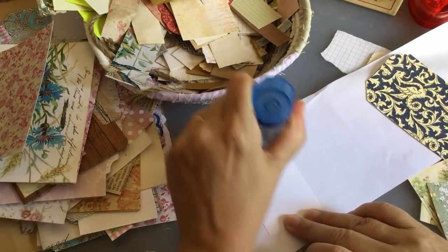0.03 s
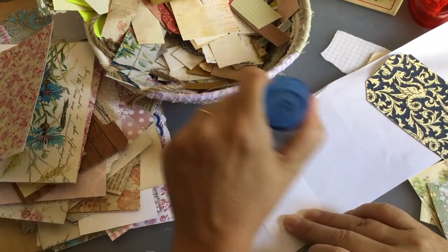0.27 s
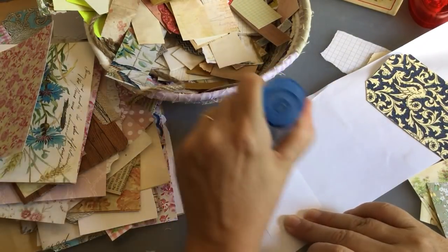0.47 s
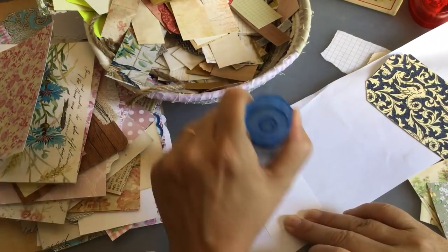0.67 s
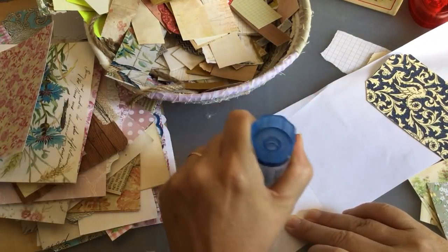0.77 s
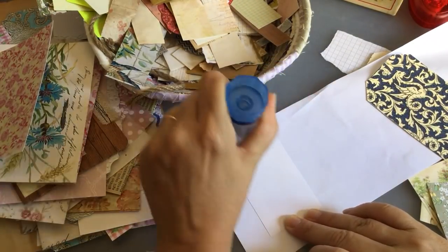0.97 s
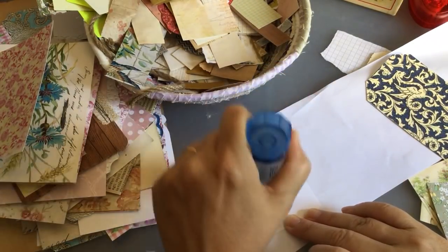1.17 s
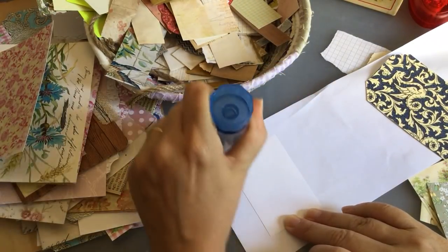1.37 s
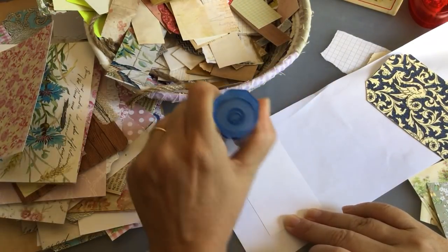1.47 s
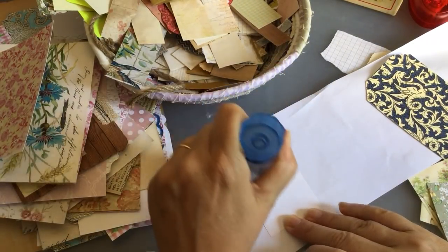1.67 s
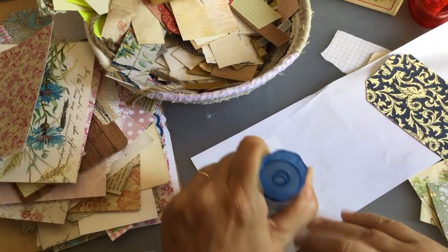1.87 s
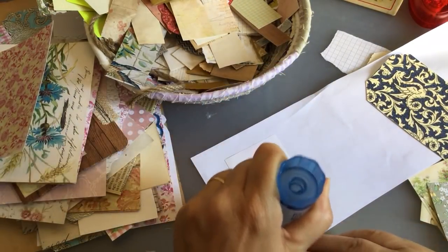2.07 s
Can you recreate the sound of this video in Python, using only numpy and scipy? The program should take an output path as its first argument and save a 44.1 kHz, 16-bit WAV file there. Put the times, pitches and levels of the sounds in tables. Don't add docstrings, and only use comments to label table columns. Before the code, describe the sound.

Five crisp taps of a plastic glue stick on paper, then a small sticky peel crackle

```python
import sys
import numpy as np
from scipy import signal
from scipy.io import wavfile

SR = 44100
rng = np.random.default_rng(int(sys.argv[2]) if len(sys.argv) > 2 else 0)


def voltage_ratio(decibels):
    exponent = np.asarray(decibels, float) / 20
    return 10 ** exponent


def dump_mix(stems):
    frames = np.atleast_2d(stems).T
    limited = np.clip(frames, -1, 1)
    pcm = np.round(limited * 32767).astype(np.int16)
    wavfile.write(sys.argv[1], SR, pcm)


N = 93933

# (tick time [s], push level [dB], contact time [ms])
DABS = [
    (.0127, -21, .55),
    (.4684, -19.2, .3),
    (.8601, -20.5, .42),
    (1.3067, -21, .3),
    (1.6782, -19.9, .18),
]
# (tick level [dB], tick pitch [Hz], tick top [Hz], knock level [dB], rustle level [dB])
DAB_SURFACES = [
    (-25.5, 4320, 9100, -55, -60),
    (-27, 4200, 9500, -45, -52.5),
    (-27, 5000, 9000, -49, -58),
    (-24, 5030, 6900, -49, -54),
    (-20, 4240, 5300, -37, -51),
]
# (time [s], level [dB])
HAND_NUDGES = [(.135, -42.5), (.257, -39), (.665, -42.5), (0.978, -46), (1.409, -47), (1.928, -52),
               (2.001, -48)]
# (pitch [Hz], level [dB], t60 [s], side [+1 toward, -1 away])
TABLE_MODES = [(83.2, -9.3, .075, 1), (98.9, -10.3, .39, -1), (135.8, -18.4, .35, -1), (167.3, -17, .27, 1),
               (181.5, -6.7, .102, -1), (212.6, -15.5, .36, -1), (261.2, -13, .196, -1),
               (317.2, -7.8, .066, -1), (365.5, -3.4, .177, 1), (397.1, -10.1, .11, 1),
               (442, -17.2, .33, -1), (524, .5, .058, 1), (559.4, -20, .13, -1), (683, -1.4, .08, 1)]
# (pitch [Hz], level
# [dB], t60 [s])
KNOCK_MODES = [(309.3, -11, 0.66), (450, -18, 0.48), (870, -8, 0.095), (932, 0, 0.082), (1124, 1.5, 0.063),
               (1218, -9.5, 0.24), (1325, 3.5, 0.037), (1537, -9, 0.075), (2220, -30, 0.045)]
# (frequency [Hz], density [dB per Hz])
TAIL_COLOUR = [(150, 14), (350, 7.5), (700, 8), (1500, 0.5), (3000, 3.5), (6000, -6), (11000, -17.5),
               (16000, -25)]
# (frequency [Hz], t60 [s])
TAIL_DECAY = [(100, 0.69), (300, 0.9), (700, 0.29), (3000, 0.11), (8000, 0.087), (15000, 0.12)]
# (frequency [Hz], rise time [s])
TAIL_RISE = [(200, .01), (2000, .003), (12000, .006)]
# (time [s], snap level [dB], crackle level around it [dB], crackle spread [s])
GLUE_SNAPS = [
    (1.8905, -29, -59.5, 0.0098),
    (2.2, -46, -57, 0.0042),
    (1.8955, -46, -61, 0.0027),
    (1.9442, -43.5, -63, 0.0012),
    (2.07, -82, -71.5, 0.011),
]
# (time [s], level [dB], spread [s])
PAPER_RUSTLES = [(.235, -78, 0.0027), (.612, -80, .003), (1.095, -73, 0.0028), (1.12, -80, .003),
                 (1.946, -58, 0.0025), (2.076, -76.5, 0.018)]
# (frequency [Hz], density [dB per Hz])
AIR_COLOUR = [(35, -49), (65, -25), (100, -3.5), (150, -9.5), (280, -11), (700, -24.5), (1500, -22.5),
              (16000, -52.5)]


def rms_one(x):
    return x / np.sqrt(np.mean(x ** 2) + 1e-20)


def at_hz(points, hz):
    table_hz, value = np.transpose(points)
    return np.interp(np.log(hz), np.log(table_hz), value)


def butter(x, order, hz, kind):
    return signal.sosfilt(signal.butter(order, hz, kind, fs=SR, output="sos"), x)


def clicks(times, size):
    out = np.full(N + SR, 1e-18)
    at = np.clip(np.asarray(times) * SR, 0, N)
    np.add.at(out, at.astype(int), size * (1 - at % 1))
    np.add.at(out, at.astype(int) + 1, size * (at % 1))
    return out[:N]


def delay(x, seconds):
    t = np.arange(N)
    return np.interp(t - SR * seconds, t, x)


def ring(x, hz, t60):
    r, w = voltage_ratio(-60 / (t60 * SR)), 2 * np.pi * hz / SR
    return signal.lfilter([0, np.sin(w)], [1, -2 * r * np.cos(w), r * r], x)


def decay(x, t60):
    return signal.lfilter([1], [1, -voltage_ratio(-60 / (t60 * SR))], x)


def soften(x, ms):
    r = np.exp(-1000 / (ms * SR))
    return signal.sosfilt([[1 - r, 0, 0, 1, -r, 0]] * 3, x)


def bands(colour, gain):
    edges = 35 * 2 ** np.arange(0, 9.1, 1 / 3)
    white = rng.standard_normal((2, N + 4000))
    out = 0
    for k, (low, high) in enumerate(zip(edges, edges[1:])):
        hz = np.sqrt(low * high)
        band = butter(white[k % 2], 2, [low, high], "band")[4000:]
        out = out + voltage_ratio(at_hz(colour, hz)) * gain(hz) * band
    return out


def table():
    push_lag_s, bending_lag_s = .00027, .00145
    rebound_s, rebound_db, rebound_ms = .0241, -1.4, .69
    push = 0
    for s, db, ms in DABS:
        start = s + push_lag_s - ms * .0012
        push = push + soften(clicks([start], voltage_ratio(db)), ms)
    push = push + voltage_ratio(rebound_db) * soften(delay(push, rebound_s), rebound_ms)
    for s, db in HAND_NUDGES:
        push = push + soften(clicks([s], voltage_ratio(db)), 0.73)
    out = 0
    for hz, db, t60, side in TABLE_MODES:
        arrival = delay(push, bending_lag_s * np.sqrt(200 / hz))
        out = out + side * voltage_ratio(db) * ring(arrival, hz, t60)
    return out


def ticks():
    lags = np.array([-6, -4, -2, 0, 1, 3])
    loss_db = np.array([-19, -20, -11, 0, -15, -17])
    out = 0
    for (s, _, ms), (db, hz, top_hz, knock_db, _) in zip(DABS, DAB_SURFACES):
        stretch = np.where(lags < -2, np.sqrt(ms / .5), 1)
        times = s + lags * rng.uniform(.96, 1.04, 6) / hz * stretch
        touch = -clicks(times, voltage_ratio(db + loss_db + rng.normal(0, 2, 6)))
        wide = butter(touch, 2, [2200, top_hz], "band")
        pitched = ring(np.diff(touch, append=0), hz, .0012)
        edge = np.diff(touch, prepend=0)
        out = out + 1.6 * wide + .8 * pitched + .15 * edge
        knock = soften(clicks([s + 0.00047], voltage_ratio(knock_db)), 0.025)
        for k, (mode_hz, mode_db, t60) in enumerate(KNOCK_MODES):
            level = voltage_ratio(mode_db + rng.normal(0, 3))
            out = out + (-1) ** k * level * ring(knock, mode_hz, t60)
    return out


def tails():
    grain_db, grain_ms = 1.5, .6
    starts = clicks([d[0] for d in DABS], voltage_ratio([d[4] for d in DAB_SURFACES]))

    def envelope(hz):
        rise = np.exp(-1 / (at_hz(TAIL_RISE, hz) * SR))
        return signal.lfilter([1 - rise], [1, -rise], decay(starts, at_hz(TAIL_DECAY, hz)))

    lumps = rms_one(soften(rng.standard_normal(N), grain_ms))
    return 4.68 * bands(TAIL_COLOUR, envelope) * voltage_ratio(grain_db * lumps)


def snaps():
    crackles_per_s, room_db, room_t60_s = 8700, -43, 0.24
    t = np.arange(N) / SR
    cloud = sum(voltage_ratio(db) * np.exp(-np.abs(t - s) / spread) for s, _, db, spread in GLUE_SNAPS)
    struck = rng.random(N) < crackles_per_s / SR
    size = voltage_ratio(3.0 * np.minimum(rng.exponential(1, N), 4))
    grains = rms_one(struck * size * rng.choice([-1, 1], N))
    main = clicks([r[0] for r in GLUE_SNAPS], voltage_ratio([r[1] for r in GLUE_SNAPS]))
    room = decay(main, room_t60_s) * rng.standard_normal(N) * voltage_ratio(room_db)
    x = butter(cloud * grains - 2 * main + room, 3, 3950, "high")
    return butter(x, 1, 15500, "low") + 0.29 * ring(x, 5800, 0.0014) + 0.3 * ring(x, 9140, 0.0012)


def rustles():
    t = np.arange(N) / SR
    puffs = sum(voltage_ratio(db) * np.exp(-.5 * ((t - s) / spread) ** 2) for s, db, spread in PAPER_RUSTLES)
    return puffs * butter(rng.standard_normal(N), 2, 7160, "high")


def room_tone():
    def resonance(hz, width_hz):
        return rms_one(ring(rng.standard_normal(N + SR), hz, 3.2 / width_hz)[SR:])

    air = voltage_ratio(-62) * rms_one(bands(AIR_COLOUR, lambda hz: 1))
    drone = voltage_ratio(-63) * resonance(102.4, 25)
    vent = voltage_ratio(-81.5) * resonance(1370, 320)
    steep = signal.cheby2(10, 30, 16300, fs=SR, output="sos")
    return butter(signal.sosfilt(steep, air + drone + vent), 4, [55, 16000], "band")


def scene():
    return (table() + ticks() + tails() + snaps() + room_tone() + rustles())[None]


def band_limit(x):
    return signal.sosfilt(signal.butter(12, 17630, fs=SR, output="sos"), x)


def record(dry):
    x = butter(dry, 2, 45, "high")
    x = signal.sosfilt(signal.cheby2(12, 40, 17600, fs=SR, output="sos"), x)
    return band_limit(x)


dry = scene()
out = record(dry)
dump_mix(out)
```